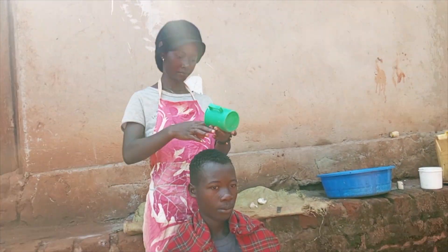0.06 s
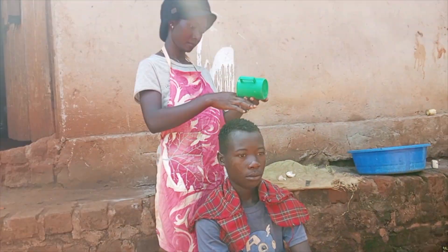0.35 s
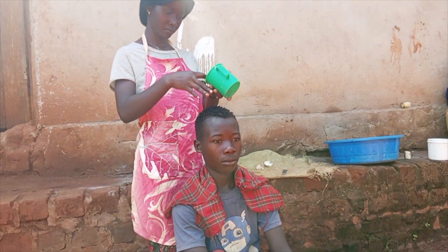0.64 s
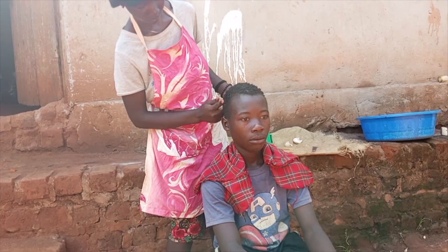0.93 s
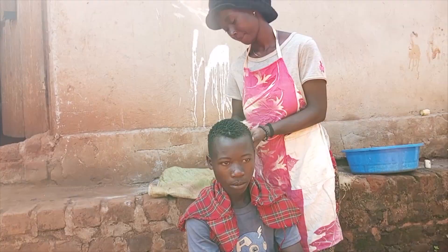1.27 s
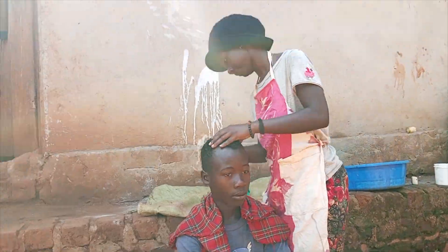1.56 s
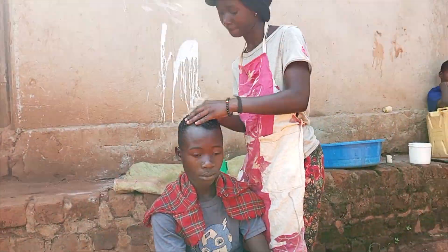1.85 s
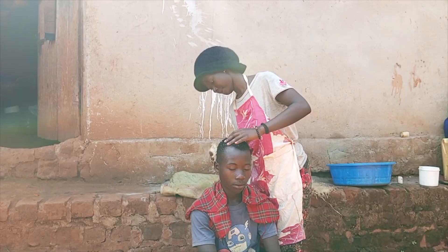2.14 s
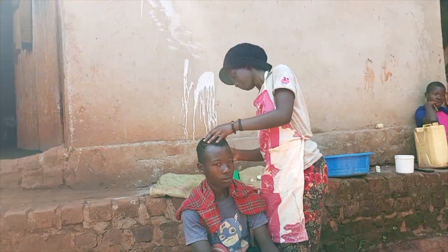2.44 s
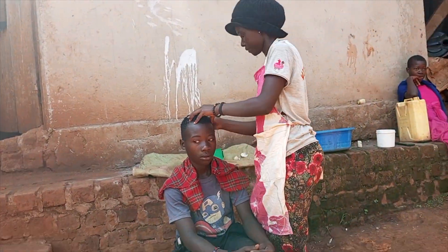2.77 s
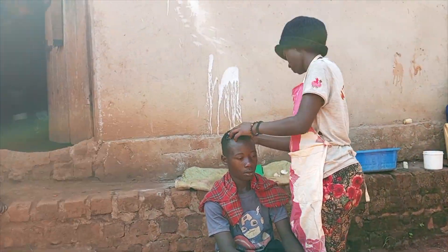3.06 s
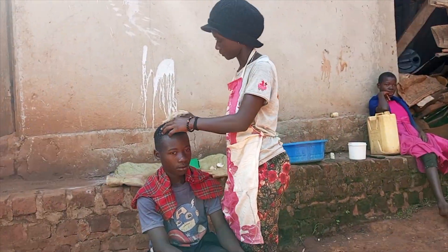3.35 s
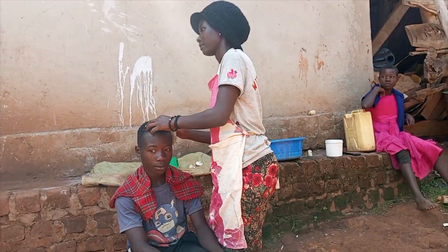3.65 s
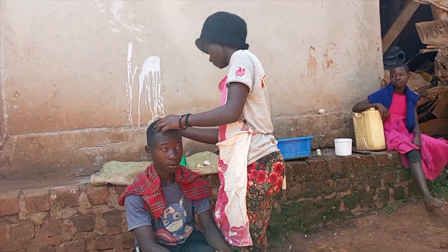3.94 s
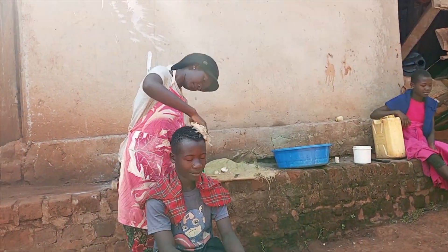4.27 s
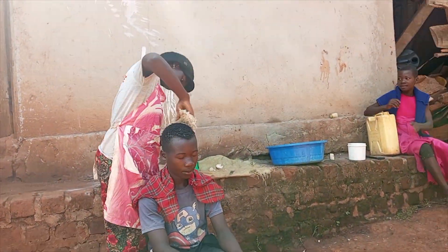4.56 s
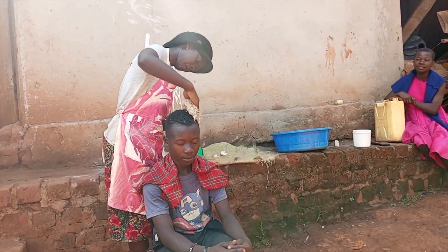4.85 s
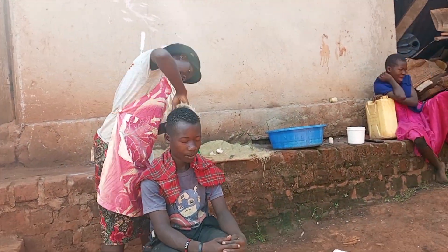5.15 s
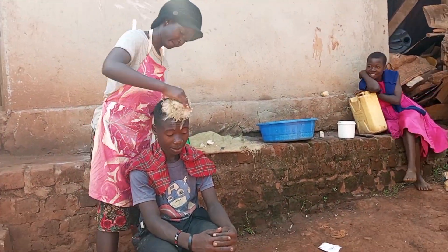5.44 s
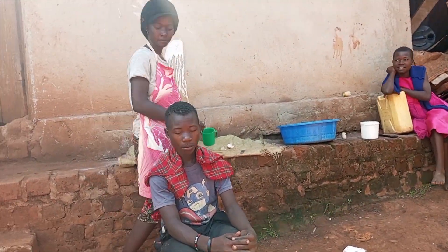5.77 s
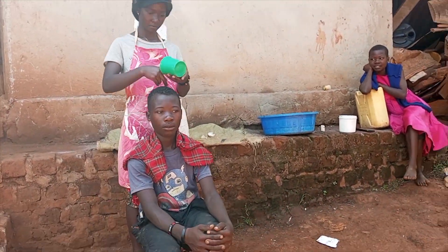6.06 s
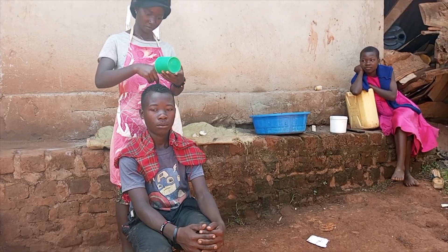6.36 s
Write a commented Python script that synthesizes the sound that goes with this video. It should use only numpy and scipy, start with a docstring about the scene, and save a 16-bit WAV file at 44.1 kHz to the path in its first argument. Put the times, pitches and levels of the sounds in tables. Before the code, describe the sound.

A faint outdoor hiss runs throughout, opening with a barely audible low rush. Thin, high chirps and squeaks, perhaps a small bird, glide and flutter from start to finish, strongest around 2.5 and 3.7 seconds. A few small wet ticks sound in the first second, and foam fizzes faintly. At about 1.2 seconds a fibrous sponge scrapes briefly through wet hair. More runs of short, scratchy scrapes follow from 1.7 to 2.1 seconds, and the loudest, sharp crackles come near 2.6 seconds as stiff fibres let go. Lighter strokes continue until about 3.4 seconds, then nearly stop while the chirps carry on, with a wet tick near 4.3. Scrubbing returns at 4.7 seconds and again from 5.2 to 5.9. Several sticky ticks come around 6.3 seconds, just before the end. The sound is mono and almost dry.

```python
"""A faint hiss and a brief low rush open on a very quiet yard. Thin, high chirps, perhaps a small bird,
glide and flutter while a fibrous sponge scrapes through wet, egg-coated hair. Foam fizzes and sticky
films burst in small ticks. Each stroke is a run of short scrapes, showers of tiny snaps that set fibre
bundles ringing, with a few loud crackles as stiff fibres let go. The sound is mono and almost dry."""
import sys
import numpy as np
from scipy import signal
from scipy.fft import rfft, irfft, next_fast_len
from scipy.io import wavfile
from scipy.ndimage import uniform_filter1d, map_coordinates

SR = 44100
rng = np.random.default_rng(int(sys.argv[2]) if len(sys.argv) > 2 else 0)


def wrap_up_sound(samples):
    """Save the sound to the file named by the first command line argument, as 16-bit audio."""
    columns = np.atleast_2d(samples).T
    # keep every value between -1 and 1, then stretch to whole-number steps
    tamed = np.clip(columns, -1, 1)
    steps = np.round(tamed * 32767).astype(np.int16)
    wavfile.write(sys.argv[1], SR, steps)


N = 287091
TIME = np.arange(N) / SR


def amp(db):
    """Amplitude ratio: tenfold for every 20 dB."""
    return 10 ** (np.asarray(db) / 20)


def unit(x):
    """Normalisation to an rms of 1."""
    return x / np.sqrt(np.mean(x ** 2) + 1e-20)


def colour(points, hz):
    """Spectral envelope: the gain of (frequency [Hz], level [dB]) points joined on a log axis."""
    knots_hz, db = np.transpose(points)
    return amp(np.interp(np.log(hz + 1), np.log(knots_hz + 1), db))


def filtered(x, response):
    """Linear filtering: the spectrum of x times a frequency response."""
    size = next_fast_len(len(x) + 4096)
    return irfft(rfft(x, size) * response(np.fft.rfftfreq(size, 1 / SR)), size)[:len(x)]


def wobble(rate, count):
    """Random modulation: count samples of a spline through rate Gaussian knots a second."""
    return map_coordinates(rng.standard_normal(2048), [np.arange(count) * rate / SR + 2], mode="mirror")


def shower(count, snaps_per_s, spread_db):
    """Shot noise: impulses of uneven size and sign at random moments."""
    impulses = (rng.random(count) < snaps_per_s / SR) * rng.choice([-1, 1], count)
    return impulses * amp(spread_db * rng.standard_normal(count))


def add(track, start_s, sound):
    """Superposition: a sound is summed into the track from start_s on."""
    part = track[max(0, round(start_s * SR)):][:len(sound)]
    part += sound[:len(part)]


# spectrum of the yard's hiss: (frequency [Hz], relative level [dB])
HISS_SPECTRUM = [(25, -21), (110, -20.5), (250, -25.5), (550, -25), (830, -19.5), (1150, -13), (1500, -5.5),
                 (2500, -3), (2950, -3.5), (3300, -8.5), (6000, -11.5), (10000, -16.5), (14500, -13),
                 (16000, -17.5)]

def yard_hiss(level_db=-73.5, drift_db=0.5):
    """Coloured noise: a thin hiss whose level drifts slightly."""
    gain = amp(level_db + drift_db * wobble(7.8, N))
    return gain * unit(filtered(rng.standard_normal(N), lambda hz: colour(HISS_SPECTRUM, hz)))


def low_rush(level_db=-75, top_hz=550, end_s=0.081, fade_s=0.0073):
    """Band-limited noise: a soft low rush that stops after a moment."""
    low = filtered(rng.standard_normal(N), lambda hz: hz / (hz + 70) / (1 + (hz / top_hz) ** 2))
    return amp(level_db) * unit(low) * np.clip((end_s - TIME) / fade_s, 0, 1)


# fizz of the wet foam under the hands: (time [s], level [dB])
FOAM_LEVELS = [(0, -96), (.6, -73), (.9, -77), (1.3, -72.5), (1.6, -69.5), (2.2, -71), (2.699, -70.5),
               (3.299, -80), (3.601, -78.5), (3.95, -88.5), (4.399, -85), (5.0, -91.5), (5.5, -73),
               (6.101, -90), (6.51, -83)]

def foam_fizz(centre_hz=9000, flicker_db=2):
    """Dense shot noise: the fine crackles of wet foam merge into a high fizz."""
    crackles = shower(N, 6000, spread_db=7.5)
    foam = filtered(crackles, lambda hz: 1 / (1 + np.log2((hz + 1) / centre_hz) ** 2))
    gain = amp(np.interp(TIME, *np.transpose(FOAM_LEVELS)))
    return gain * unit(foam * amp(flicker_db * wobble(47, N)))


def chirp_note(length_s, start_hz, middle_hz, end_hz, harmonic_db, rough):
    """Frequency and amplitude modulation: a gliding harmonic tone that wavers with roughness."""
    count = int(length_s * SR)
    progress = np.linspace(0, 1, count)
    arch = 1 - np.abs(2 * progress - 1) ** 3
    glide_hz = start_hz + (end_hz - start_hz) * progress + (middle_hz - (start_hz + end_hz) / 2) * arch
    waver = 0.009 * np.sqrt(10 * rough + 0.083) * wobble(260, count)
    rasp = 0.098 * rough * wobble(2600, count)
    phase = 2 * np.pi * np.cumsum(glide_hz * (1 + waver + rasp)) / SR
    from_edge_s = np.minimum(progress, 1 - progress) * length_s
    edges = np.sin(np.pi / 2 * np.clip(from_edge_s / 0.00095, 0, 1)) ** 2
    swell_db = 6.5 * np.sin(np.pi * progress) - 3 * progress
    contour = edges * amp(swell_db + 7 * np.sqrt(rough) * wobble(160, count))
    flutter_db = 8.5 * min(1, .15 + 7 * rough)  # clean squeaks flutter least
    sound = np.zeros(count)
    for k, db in enumerate(harmonic_db, 1):
        shimmer = amp(-20) * wobble(6000, count)  # no two cycles are equally strong
        envelope = unit(contour * amp(flutter_db * wobble(270, count))) * (1 + shimmer)
        sound += amp(db) * np.sqrt(2) * envelope * np.sin(k * phase) * (k * glide_hz < SR / 2)
    return sound


def squeak(length_s, hz, glide, bend, harmonic_db, rough, breaks_per_s=240, scatter=0.12, fall=0.23):
    """Segmented pitch contour: roughness breaks one arch of pitch into short, mostly falling notes."""
    notes = 1 + int(length_s * rough * breaks_per_s)
    note_s = length_s / notes * (0.98 if notes > 1 else 1)
    sound = np.zeros(int(length_s * SR) + SR // 50)
    for k, (tune, tilt) in enumerate(rng.standard_normal((notes, 2))):
        position = (k + np.linspace(0, 1, 3)) / notes - .5  # the note's start, middle and end
        slope = fall * (1 + tilt) * np.array([.5, 0, -.5])
        detune = (notes > 1) * rough * (scatter * tune + slope)
        pitches_hz = hz * (1 + glide * position - bend * (2 * position) ** 2 + detune)
        add(sound, k * length_s / notes, chirp_note(note_s, *pitches_hz, harmonic_db, rough))
    return sound


# thin, high squeaks and chirps, perhaps a small bird: (time [s], length [s], pitch [Hz],
# glide [share of pitch], fundamental level [dB], octave level [dB], roughness [0-1])
SQUEAKS = [(0.076, 0.041, 5210, -0.14, -53, -70, 0.3), (0.076, 0.047, 6870, .12, -80, -39, 0.29),
           (0.125, 0.055, 6160, -0.13, -92, -40, 0.04), (0.364, 0.01, 6350, -0.31, -46.5, -54, 0.25),
           (.678, 0.01, 6940, -0.12, -47, -68, 0.01), (0.689, 0.091, 6500, -0.18, -63, -58, 0.07),
           (0.83, .075, 6960, 0.2, -50.5, -55.5, 0.24), (.905, 0.032, 6420, 0.0017, -66.5, -48, 0),
           (0.939, 0.11, 6100, -0.1, -64, -65.5, 0.21), (1.082, 0.025, 6050, 0.011, -59.5, -51.5, 0.02),
           (1.117, 0.023, 4780, -0.093, -57.5, -74.5, 0.15), (1.166, 0.035, 5560, 0.015, -57, -79, 0.2),
           (1.406, .02, 5050, -.1, -59, -74, 0.25), (1.679, .036, 6050, -0.084, -53.5, -54, 0.09),
           (1.847, 0.012, 7460, 0.034, -40, -89, 0.04), (1.871, 0.029, 6170, -.1, -58.5, -54.5, 0.08),
           (1.962, 0.023, 6500, -0.08, -63, -49, 0.33), (2.083, 0.038, 7760, -0.071, -50, -63, .2),
           (2.131, .022, 6160, -.17, -61, -72, .15), (2.379, 0.014, 5700, -0.26, -85, -49, 0.54),
           (2.499, 0.013, 5970, .05, -91, -40, 0.24), (2.513, 0.027, 7300, 0.1, -92, -33.5, 0.27),
           (2.545, 0.059, 6360, -0.25, -84, -35.5, 0.04), (2.659, 0.052, 5200, -.1, -64, -56, 0.1),
           (2.791, 0.022, 4320, -.13, -87, -47.5, 0.13), (2.901, .031, 5980, 0.07, -69, -56.5, .4),
           (2.968, .11, 4870, -0.13, -85, -56, 0.18), (3.143, 0.089, 5130, -0.085, -84, -56, 0.29),
           (3.324, 0.026, 5230, -0.022, -88, -53.5, 0.26), (3.654, 0.0067, 5680, 0.15, -48.5, -63, 0.31),
           (3.662, 0.029, 6850, -0.041, -53, -32, 0.18), (3.695, 0.031, 5950, -0.21, -48, -33, 0.12),
           (3.768, 0.015, 4830, -.08, -90, -45.5, 0.82), (3.792, 0.031, 6550, -0.017, -66, -58.5, 0.1),
           (3.844, 0.021, 6240, 0.023, -38.5, -47, 0.06), (3.912, 0.089, 6540, -0.038, -62.5, -53.5, 0.23),
           (4.023, .025, 6120, -0.005, -57.5, -90, 0.14), (4.081, 0.032, 5840, -0.037, -36.5, -44, 0.02),
           (4.17, 0.034, 6070, .08, -59, -78, 0.65), (4.275, 0.033, 5920, 0.0017, -38.5, -51.5, 0.02),
           (4.339, 0.03, 5560, 0.084, -52, -92.5, 0.02), (4.628, 0.027, 6500, -0.47, -56, -55, 0.34),
           (4.677, 0.012, 4460, 0.037, -73, -41.5, 0), (4.735, 0.039, 4920, 0.14, -57.5, -47, 0.18),
           (4.852, .028, 5430, 0.051, -51.5, -59.5, 0.09), (5.038, 0.031, 4810, -.3, -63.5, -43.5, 0.14),
           (5.053, 0.013, 5820, -0.23, -81, -38, 0.1), (5.139, 0.019, 5960, 0.27, -60.5, -61, 0.42),
           (5.171, 0.03, 5870, -0.15, -54.5, -56, 0.2), (5.322, .022, 8330, -0.02, -47.5, -88, 0.07),
           (5.346, 0.039, 7030, 0.076, -55, -65, 0.18), (5.409, 0.019, 5650, -0.27, -51, -49.5, .22),
           (5.515, 0.03, 4380, 0.089, -86, -42.5, 0.37), (5.537, 0.028, 7460, -0.025, -41, -65, 0.1),
           (5.593, 0.03, 4960, -.28, -55, -55.5, 0.27), (5.884, 0.03, 4330, 0.13, -63, -48.5, 0.19),
           (5.909, 0.061, 5160, -0.061, -48, -42.5, 0.33), (5.977, 0.016, 4800, -0.051, -43.5, -58, 0),
           (5.992, 0.0061, 5830, 0.4, -41, -60, 0.1), (6.031, .04, 4500, -0.0022, -62, -64.5, 0.18),
           (6.101, .062, 4660, 0.0097, -65.5, -51, 0.25), (6.28, 0.0077, 4480, -0.12, -59.5, -48.5, 0.25),
           (6.416, 0.042, 6080, -0.009, -66, -67, 0.27)]
# strength of their third harmonic: (time [s], level relative to the octave [dB])
THIRD_HARMONIC = [(0, -38), (3.3, -28), (3.8, -19), (5.3, -40), (5.5, -7), (5.95, -0.5), (6.13, -13),
                  (6.3, -21)]

def squeaks(arch=.035, swoop=0.15, swoop_below_hz=6900, grit_db=-24, grit_hz=6500):
    """Frequency sweeps: high arched chirps with a faint gritty edge; strong, low ones swoop."""
    tones = np.zeros(N)
    for s, length_s, hz, glide, fundamental_db, octave_db, rough in SQUEAKS:
        strength = np.interp(fundamental_db, [-55, -41.5], [0, 1])
        bend = arch + swoop * strength * (hz < swoop_below_hz)  # share of the pitch lost at both ends
        third_db = octave_db + np.interp(s, *np.transpose(THIRD_HARMONIC))
        add(tones, s, squeak(length_s, hz, glide, bend, [fundamental_db, octave_db, third_db], rough))
    # the lower, heavier squeaks carry most of the grit
    heavy = filtered(tones, lambda hz: 1 / (1 + (hz / 9000) ** 6))
    envelope = np.sqrt(np.abs(uniform_filter1d(heavy ** 2, size=260)))
    grains = shower(N, 2000, spread_db=1.5)
    grit = filtered(grains, lambda hz: 1 / (1 + np.log2((hz + 1) / grit_hz) ** 4))
    return tones + amp(grit_db) * envelope * unit(grit)


def twitter(softest_db=-72, pitch_hz=5200, count=85):
    """Downward frequency sweeps: a faint twitter of brief notes trails randomly chosen squeaks."""
    track = np.zeros(N)
    for pick, delay, size, tune, loud in rng.random((count, 5)):
        s = SQUEAKS[int(pick * len(SQUEAKS))][0] + .03 + 0.14 * delay
        hz, db = pitch_hz * (0.78 + 0.34 * tune), softest_db + 10 * loud
        note = chirp_note(.006 + .014 * size, hz * 1.03, hz, hz * .96, [db - 11, db], rough=.35)
        add(track, s, note)
    return track


# bursts of sticky film: (time [s], level [dB], centre frequency [Hz], time to decay by 60 dB [s])
FILM_BURSTS = [(0.1874, -51.5, 8200, 0.018), (0.384, -49.5, 7400, 0.017), (0.3955, -28, 9550, 0.0026),
               (0.633, -48.5, 4160, 0.0087), (0.888, -50, 4400, 0.015), (1.058, -47.5, 4500, .01),
               (2.5236, -36.5, 5660, 0.009), (4.2857, -31.5, 7600, 0.02), (6.2207, -36.5, 6300, 0.053),
               (6.295, -28, 12400, 0.0073), (6.3437, -41.5, 5260, 0.013), (6.3632, -27, 4500, 0.01)]

def wet_ticks(half_width_octaves=1.4, attack_s=0.00051):
    """Film rupture: each burst is a puff of broad noise that decays exponentially."""
    track, t = np.zeros(N), np.arange(SR // 20) / SR
    for s, db, centre_hz, t60 in FILM_BURSTS:
        puff = filtered(rng.standard_normal(len(t)),
                        lambda hz: 1 / (1 + (np.log2((hz + 1) / centre_hz) / half_width_octaves) ** 2) ** 2)
        envelope = amp(db - 60 * t / t60) * (1 - np.exp(-t / attack_s))
        add(track, s, envelope * unit(puff))
    return track


# spectrum of the fibres before their resonance: (frequency [Hz], relative level [dB])
FIBRE_SPECTRUM = [(25, -21.5), (120, -20.5), (480, -29), (750, -19.5), (1050, -9), (1500, -3), (2400, -3),
                  (4000, -5), (7000, -14), (12000, -36)]

def fibre_bundle(force, pitch_hz, q):
    """Damped resonance: a bundle of quality factor q responds up to its pitch and little above it."""
    def response(hz):
        return colour(FIBRE_SPECTRUM, hz) / (1 - (hz / pitch_hz) ** 2 + 1j * hz / (pitch_hz * q))
    return unit(filtered(force, response))


# how firmly the sponge lies on the head: (time [s], contact [0-1])
SPONGE_CONTACT = [(1.15, 0), (1.25, 0.44), (3.5, 1), (3.9, 0.24), (4.6, 0.22), (5.1, 0.72), (5.9, 1),
                  (6.05, 0.7)]

def stray_hairs(level_db=-77):
    """Sparse shot noise: single hairs flick, louder as the sponge lies more firmly."""
    contact = np.interp(TIME, *np.transpose(SPONGE_CONTACT))
    return amp(level_db) * contact * fibre_bundle(shower(N, 40, spread_db=1.5), pitch_hz=1900, q=0.28)


SCRAPE_TIME = np.arange(-SR // 20, SR // 20) / SR  # seconds from the centre of a scrape
MIDDLING_HZ, MIDDLING_DB, MIDDLING_HALF_WIDTH_S = 2120, -41, .002  # a scrape of middling force

def scrape(half_width_s, db, slips_per_s=305.7, slip_db=6, db_per_octave=25.5):
    """Stick-slip excitation: a bundle grips, stutters and lets go, ringing higher in a harder scrape."""
    steepness = 4.5 + half_width_s / .0008
    grip = 1 / np.sqrt(1 + np.abs(SCRAPE_TIME / (1.6 * half_width_s)) ** steepness)
    slips = grip * amp(slip_db * wobble(slips_per_s, len(grip)))
    force = slips * shower(len(grip), 7000, spread_db=4)
    pitch_hz = MIDDLING_HZ * 2 ** ((db - MIDDLING_DB) / db_per_octave)
    pitch_hz *= (half_width_s / MIDDLING_HALF_WIDTH_S) ** 0.02  # longer scrapes are slightly brighter
    return amp(db) * np.sqrt(np.mean(grip ** 2)) * fibre_bundle(force, pitch_hz, q=1.34)


# fibres dragged over hair: (centre time [s], half width [s], level [dB])
SCRAPES = [(1.212, .002, -26), (1.223, 0.0018, -36.5), (1.2371, 0.00075, -39), (1.2711, 0.00029, -28),
           (1.312, 0.0094, -63), (1.6998, 0.0039, -33.5), (1.796, 0.0054, -43), (1.84, 0.0015, -47),
           (1.871, 0.0089, -43), (1.908, 0.0016, -28.5), (1.948, 0.0057, -45), (1.986, 0.0042, -36),
           (2.004, 0.0031, -26.5), (2.0153, 0.00052, -20.5), (2.0241, 0.00066, -24.5),
           (2.0368, 0.0029, -29), (2.049, 0.0028, -30.5), (2.081, 0.013, -46), (2.118, 0.0099, -58),
           (2.198, 0.008, -61.5), (2.374, 0.0015, -50), (2.4085, 0.00081, -38), (2.554, 0.014, -53),
           (2.605, 0.0044, -42.5), (2.6229, 0.005, -33), (2.6481, 0.0025, -28.5), (2.657, 0.005, -30.5),
           (2.677, 0.0092, -41), (2.724, 0.00017, -33), (2.765, 0.0012, -44), (2.8065, 0.00028, -37.5),
           (2.8689, 0.0019, -39.5), (2.915, 0.0011, -33.5), (2.9991, 0.00034, -38.5),
           (3.0507, 0.00085, -43), (3.077, 0.0041, -50.5), (3.18, 0.0094, -43), (3.216, 0.0022, -34),
           (3.2734, 0.00021, -32), (3.302, 0.0041, -53.5), (3.3365, 0.00067, -39), (3.426, 0.0045, -46.5),
           (3.593, 0.0085, -55.5), (3.799, 0.0025, -62.5), (3.883, 0.009, -65.5), (4.145, 0.001, -57),
           (4.721, 0.0078, -50), (4.7598, 0.00039, -25), (4.7682, 0.0019, -33.5), (4.8057, 0.0037, -34),
           (4.821, 0.0025, -41), (4.8726, 0.00042, -36.5), (5.1443, 0.0011, -46), (5.225, 0.0097, -50),
           (5.323, 0.0044, -41), (5.3672, .0026, -35.5), (5.3889, 0.00071, -35.5), (5.4084, 0.0012, -32.5),
           (5.456, 0.0023, -38), (5.525, 0.0085, -56.5), (5.63, 0.0036, -50.5), (5.774, 0.0026, -32),
           (5.792, 0.0014, -29.5), (5.8056, 0.0054, -35), (5.847, 0.0066, -33), (5.874, 0.0051, -43.5)]

def scrapes(lesser_slips=2, lead_s=0.0067, span_s=.045, drag_db=-28, drag_s=0.013):
    """Sliding friction: the sponge catches bundle after bundle, amid lesser slips and a soft drag."""
    track, drag_power = np.zeros(N), np.zeros(N)
    for centre_s, half_width_s, db in SCRAPES:
        start_s = centre_s + SCRAPE_TIME[0]
        add(track, start_s, scrape(half_width_s, db))
        for share in (np.arange(lesser_slips) + rng.random(lesser_slips)) / lesser_slips:
            lesser_db = -57 + 0.1 * (db - MIDDLING_DB) + 3 * rng.standard_normal()
            add(track, start_s - lead_s + span_s * share, scrape(half_width_s=0.00084, db=lesser_db))
        add(drag_power, start_s, amp(db + drag_db) ** 2 * np.exp(-2 * np.abs(SCRAPE_TIME) / drag_s))
    drag = fibre_bundle(shower(N, 2500, spread_db=11.5), pitch_hz=2100, q=1.3)
    return track + np.sqrt(drag_power) * drag


def causal_pulse(spectrum, size=2048):
    """Minimum phase: folding the cepstrum gives the promptest pulse with this spectrum, at peak 1."""
    cepstrum = irfft(np.log(colour(spectrum, np.fft.rfftfreq(size, 1 / SR))))
    cepstrum[1:size // 2] *= 2
    cepstrum[size // 2 + 1:] = 0
    pulse = irfft(np.exp(rfft(cepstrum)))
    return pulse / np.abs(pulse).max()


# single stiff fibres letting go: (time [s], peak level before the gain [dB])
FIBRE_SNAPS = [(1.2107, -18), (1.2689, -24.5), (1.9078, -21.5), (2.007, -16.5), (2.0156, -19.5),
               (2.023, -17), (2.6356, -3), (2.639, -7.5), (2.647, -18), (2.657, -10.5), (5.8462, -27.5)]
# spectrum of one snap: (frequency [Hz], relative level [dB])
SNAP_SPECTRUM = [(25, -30.5), (120, -21.5), (480, -29.5), (800, -26.5), (1500, -0.5), (2800, -1),
                 (5000, 0.5), (8000, -7), (11000, -26), (16000, -56)]

def fibre_snaps(gain_db=-1):
    """Sudden elastic release: a stiff fibre lets go in one sharp pulse."""
    track, pulse = np.zeros(N), causal_pulse(SNAP_SPECTRUM)
    for s, db in FIBRE_SNAPS:
        add(track, s, amp(db + gain_db) * pulse)
    return track


def wall_reflections(x, level_db=-40, t60=0.15, delay_s=.006):
    """Reverberation: the house wall and the yard answer with a faint, exponentially decaying tail."""
    t = np.arange(SR // 2) / SR
    tail = rng.standard_normal(len(t)) * amp(-60 * t / t60) * (t > delay_s)
    return amp(level_db) * signal.fftconvolve(x, tail / np.linalg.norm(tail))[:N]


def scene():
    """Superposition: the direct sound, its reflections and the background sum in one channel."""
    fibres = scrapes() + fibre_snaps() + stray_hairs()
    direct = fibres + squeaks() + twitter() + wet_ticks() + foam_fizz()
    return (direct + wall_reflections(direct) + yard_hiss() + low_rush())[None]


def record(dry):
    """Band limiting: a steep low-pass removes the treble above 16.1 kHz."""
    return np.array([filtered(x, lambda hz: 1 / np.sqrt(1 + (hz / 16100) ** 160)) for x in dry])


dry = scene()
out = record(dry)
wrap_up_sound(out)
```